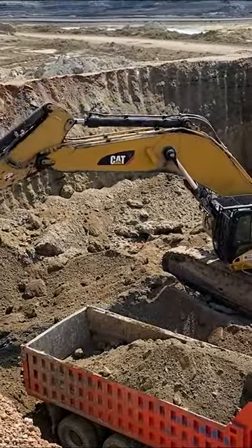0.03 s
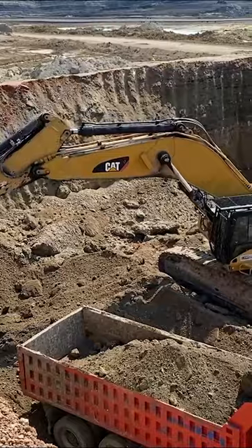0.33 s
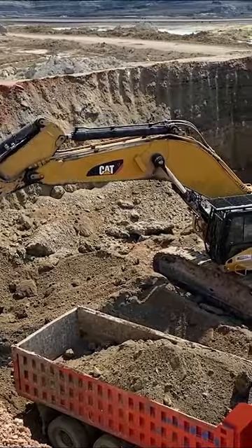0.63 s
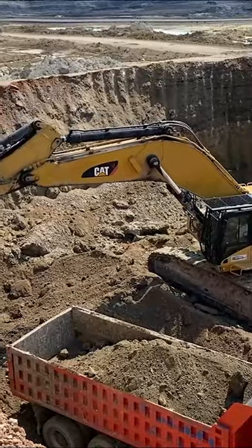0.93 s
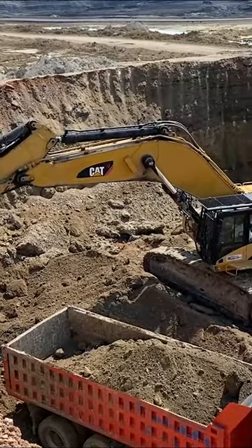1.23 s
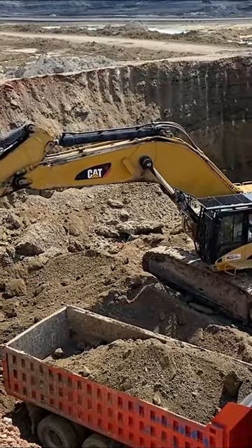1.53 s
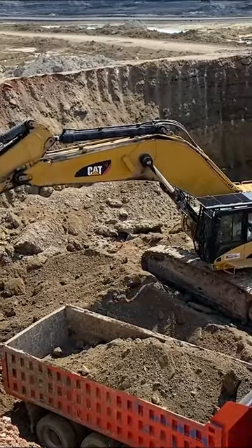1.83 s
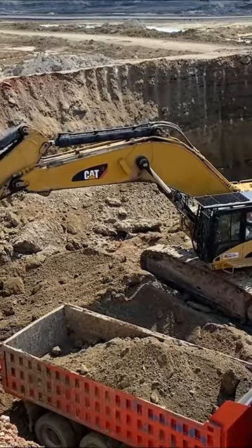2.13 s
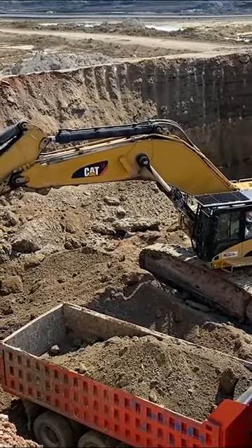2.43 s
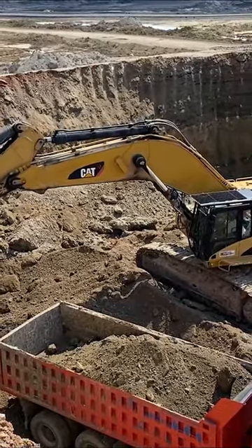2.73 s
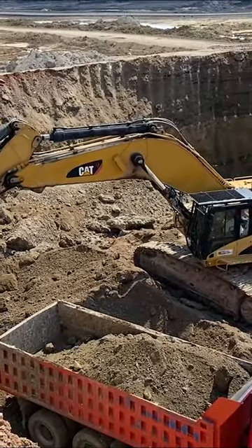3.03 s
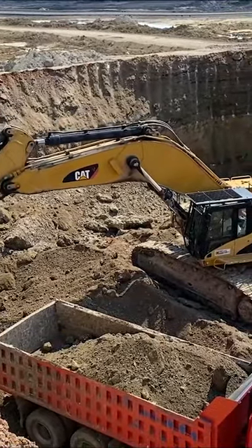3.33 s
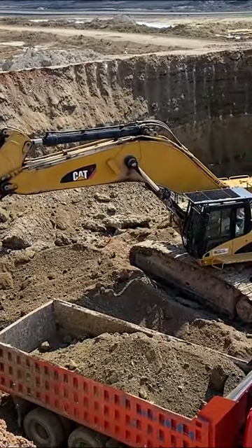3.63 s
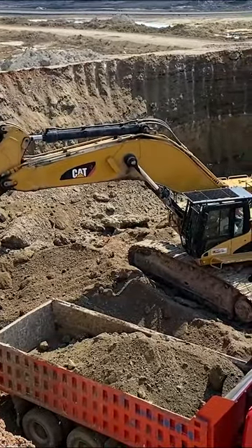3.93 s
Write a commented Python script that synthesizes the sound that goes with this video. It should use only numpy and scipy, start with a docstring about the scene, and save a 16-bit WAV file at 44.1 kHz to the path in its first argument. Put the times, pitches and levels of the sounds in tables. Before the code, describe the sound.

An excavator's diesel engine drones and clatters throughout, sagging slightly under load, with a pump hum and faint hydraulic hiss. A thin squeal and light squeaks sound in the first second and a half. From about 1.5 seconds the steel bucket knocks and clanks, strongest then, around 2 seconds and near 3.3. Earth tumbles dully with the knocks, clods thump and stones clack, until a last knock near 3.8 seconds.

```python
"""A six-cylinder diesel drones and clatters, sagging under load: an excavator in a sand pit, from the rim.
Exhaust tones and pump hum follow the crankshaft; each firing rattles the casing. The steel bucket
knocks and clanks several times, earth tumbles with a dull rumble, clods thump and stones clack.
Behind these, oil hisses through valves, the arm squeals thinly and its joints squeak."""
import sys
import numpy as np
from scipy import signal
from scipy.fft import rfft, irfft
from scipy.io import wavfile

SR = 44100
rng = np.random.default_rng(int(sys.argv[2]) if len(sys.argv) > 2 else 0)


def unload_audio(sound):
    """Save the sound as a 16-bit wav file, at the path given as the first command line argument."""
    columns = np.transpose(np.atleast_2d(sound))
    # keep every value between -1 and 1, then stretch to whole-number steps
    steps = np.round(np.clip(columns, -1, 1) * 32767)
    wavfile.write(sys.argv[1], SR, steps.astype(np.int16))


N = 176400
T = np.arange(N) / SR

# crankshaft speed: time_s, speed_hz
CRANK_SPEED = [(0, 30.5), (.3, 30.4), (.58, 32.2), (1.4, 32.6), (1.85, 32.4), (2.07, 30.8), (2.45, 32.8),
               (3, 32.4), (3.25, 31.6), (3.66, 32.7), (4, 31.2)]
# bucket knocks: start_s, level_db, rattle_s, thud_db, crack_db
BUCKET_KNOCKS = [(1.546, -18, 0.037, 2, 1.5), (1.947, -22.5, 0.0063, -1.5, -2.5),
                 (2.012, -19.5, 0.025, -1, 2.5), (2.062, -21, 0.051, 1, 3.5),
                 (2.299, -28.5, 0.0069, -4, -1), (2.619, -27.5, 0.015, -1, -1),
                 (2.668, -36.5, 0.0064, -5, 14), (2.946, -27, 0.022, -5, 1.5), (3.25, -23.5, 0.019, -2, -2),
                 (3.327, -25.5, 0.025, -6.5, 3), (3.386, -18.5, 0.016, -8, 3.5),
                 (3.84, -27.5, 0.016, 2, -1)]
# midrange of an impact: freq_hz, density_db
CLANK_SPECTRUM = [(250, -12), (500, 3), (780, 4.5), (880, -4), (1150, 6), (1400, -2.5), (1880, -9.5),
                  (2150, -4), (2800, -46)]


def exhaust():
    """Drone at the firing rate, three per crank turn, and its octave."""
    # firing tone: time_s, level_db
    loudness = [(0, -15), (.35, -16), (.6, -22.5), (1.78, -24), (1.93, -19.5), (2.1, -19.5), (2.35, -24),
                (3.3, -20), (3.66, -26.5), (4, -16.5)]
    # exhaust tones: crank_multiple, gain_db
    orders = [(3, -0.5), (6, -10)]
    return from_db(in_time(loudness)[0]) * crank_tones(orders, flutter_db=2.0, wander_rad=0.19)


def casing_clatter():
    """Noise swells at every firing and excites the engine casing."""
    # casing resonances: pitch_hz, base_width_hz, gain_db
    modes = [(583, 146, -1.5), (669, 82, -2), (1048, 120, -2), (1608, 147, -2.5), (2158, 112, -3.5),
             (6270, 110, -18.5)]
    level_db, firing_depth, broadening = -32, 0.215, 1.6
    firing = np.cos(2 * np.pi * 3 * crank_turns())
    bursts = noise([(20, 0), (20000, 0)]) * np.exp(firing_depth * firing) * from_db(drift(17))
    clatter = sum(from_db(db) * resonate_twice(bursts, hz, width_hz * broadening)
                  for hz, width_hz, db in modes)
    return from_db(level_db) * rms_one(clatter)


def bucket():
    """Each knock is a run of contacts: thud, gritty clank, crack, sprayed sand and ringing steel."""
    # low end of a knock: freq_hz, density_db
    thud_spectrum = [(70, -7), (140, 1.5), (270, 5.5), (420, -4.5), (700, -52)]
    # top end of a knock: freq_hz, density_db
    crack_spectrum = [(1500, -0.5), (2600, -3), (3700, 2), (4800, -6), (7500, -36)]
    # sand thrown by blows into soil: centre_hz, width_hz, re_thud_db
    spray_band = (6000, 3000, -19)
    # steel bucket modes: pitch_hz, gain_db, t60_s
    modes = [(537, -5.5, .8), (783, -2, 0.42), (1220, -8, 0.19), (1603, 2, 0.12), (2210, -0.5, 0.17),
             (2907, -12.5, 0.35), (3520, -3, .16)]
    clank_gain_db, crack_gain_db, ring_gain_db = 0.5, -7, -5.5
    contacts_per_s, right_lag_ms = 620, 0.09  # the bucket works to the left
    _, db, _, thud_db, crack_db = np.transpose(BUCKET_KNOCKS)
    grit = rms_one(from_db(-drift(130)))
    thud = knock_envelope(db + thud_db, t60_s=0.37) * noise(thud_spectrum, direct=True)
    clank = knock_envelope(db + thud_db / 2 + clank_gain_db, t60_s=0.24)
    clank = clank * noise(CLANK_SPECTRUM, direct=True)
    crack = knock_envelope(db + crack_db + crack_gain_db, t60_s=0.14)
    crack = crack * noise(crack_spectrum, direct=True)
    spray_hz, spray_width_hz, spray_db = spray_band
    sand = resonate_twice(rng.standard_normal((2, N)), spray_hz, spray_width_hz)
    spray = knock_envelope(db + thud_db + spray_db, t60_s=0.14) * rms_one(sand)
    force = knock_envelope(db - thud_db, t60_s=0.052)  # blows cushioned by soil ring less
    contacts = force * (rng.random(N) < contacts_per_s / SR)
    steel = 0
    for hz, mode_db, t60_s in modes:
        coupling = rng.standard_normal(N) + 0.5 * rng.standard_normal((2, N))
        steel += from_db(mode_db) * ring(contacts * coupling, hz, t60_s)
    ringing = from_db(ring_gain_db) * np.std(force) * rms_one(steel)
    left, right = thud + grit * (clank + crack + spray) + ringing
    return np.array([left, lag(right, right_lag_ms)])


def knock_envelope(levels_db, t60_s):
    """Every knock rises, holds while the bucket rattles, and dies away."""
    attack_share = 0.23
    power = 0
    for (start_s, _, rattle_s, _, _), db in zip(BUCKET_KNOCKS, levels_db):
        rise = np.clip((T - start_s) / (attack_share * rattle_s), 0, 1)
        power += (from_db(db) * rise * decay(start_s + rattle_s, t60_s)) ** 2
    return np.sqrt(power)


def earth():
    """Soil tumbles in a lumpy rumble; heavy clods thump as they land."""
    # tumbling soil: time_s, level_db
    loudness = [(1.55, -43), (1.62, -16), (1.8, -52), (2.03, -14.5), (2.4, -20), (2.52, -27.5), (3.05, -29),
                (3.42, -21), (3.72, -31), (3.9, -24.5)]
    # soil colour: freq_hz, density_db
    spectrum = [(33, -23), (130, 2), (200, -2.5), (400, -11.5), (1100, -17), (1900, -38.5), (9000, -58)]
    # clod landings: start_s, impulse_db
    clods = [(1.582, -0.5), (2.228, -3), (2.388, -1), (2.424, -3.5), (3.356, -5), (3.937, -7)]
    clod_hz, lumps_db = 135, 2.1
    landings = np.zeros(N)
    for start_s, db in clods:
        landings[int(start_s * SR)] = from_db(db)
    thumps = ring(resonate(landings, clod_hz, 2 * clod_hz), clod_hz, t60_s=0.04)
    tumble = rms_one(noise(spectrum) * from_db(lumps_db * drift(30)))
    return thumps + from_db(in_time(loudness)[0]) * tumble


def stones():
    """Loose stones drop, each with a dry clack."""
    # stone landings: start_s, level_db
    drops = [(1.669, -23), (2.176, -26.5), (2.205, -27), (2.696, -24), (3.161, -27), (3.814, -28)]
    envelope = sum((T > start_s) * from_db(db) * decay(start_s, t60_s=0.1) for start_s, db in drops)
    clack = resonate(noise(CLANK_SPECTRUM, direct=True), hz=1120, width_hz=1100)
    return envelope * rms_one(clack)


def machine_rumble():
    """Low, nearly steady noise of the machinery."""
    # rumble colour: freq_hz, density_db
    spectrum = [(25, -27), (42, -5), (60, 1.5), (155, -4.5), (215, -12), (340, -12.5), (430, -19.5),
                (1400, -25.5), (1900, -35), (2800, -33.5), (5000, -40), (8000, -60)]
    return from_db(-22 + 0.24 * drift(13)) * noise(spectrum)


def pump_hum():
    """The hydraulic pumps hum at multiples of crank speed."""
    # hum: time_s, level_db
    loudness = [(0, -34), (.45, -33), (.6, -29), (1.15, -28.5), (1.45, -35), (3.3, -34), (3.65, -32),
                (4, -35.5)]
    # pump tones: crank_multiple, gain_db
    orders = [(7, -0.5), (9, -1), (18, -14.5)]
    return from_db(in_time(loudness)[0]) * crank_tones(orders, flutter_db=1.0, wander_rad=0.1)


def singing_panel():
    """A panel resonates when the sagging engine brings a pump tone onto its pitch."""
    # panel resonance: unrounded_crank_multiple, pitch_hz, width_hz, peak_db
    resonance = (17.5, 555, 16, -33)
    order, hz, width_hz, db = resonance
    drive_hz = np.round(order) * in_time(CRANK_SPEED)[0]
    response = 1 / np.hypot(1, 2 * (drive_hz - hz) / width_hz)
    return from_db(db + 2 * drift(4.9)) * response * np.sin(2 * np.pi * np.cumsum(drive_hz) / SR)


def valves():
    """Oil hisses through valves with a faint falling whistle, reaching the right ear first."""
    # oil hiss: time_s, level_db
    loudness = [(0, -41), (.3, -38), (1.2, -45), (1.42, -42.5), (1.75, -49), (2.03, -40), (2.55, -42.5),
                (3, -45), (3.6, -42.5), (3.8, -47)]
    # hiss colour: freq_hz, density_db
    spectrum = [(1500, -5), (3600, 3), (5400, -2.5), (7500, 0), (10700, 1.5), (14000, -10)]
    # breathy whistle: time_s, pitch_hz, level_db
    whistle = [(.45, 12200, -53), (.72, 11400, -44.5), (1.42, 10150, -54), (1.9, 9150, -57)]
    whistle_hz, whistle_db = in_time(whistle)
    hiss_gain = from_db(in_time(loudness)[0] + drift(16))
    direct = hiss_gain * noise(spectrum)[0] + from_db(whistle_db) * narrow_tone(whistle_hz, width_hz=360)
    diffuse = hiss_gain * from_db(-4.5) * noise(spectrum)
    return np.array([lag(direct, ms=0.184), direct]) + diffuse


def arm_squeal():
    """The moving arm gives one thin, wavering tone."""
    # squeal: start_s, length_s, pitch_hz, level_db
    squeal = (.04, .72, 3815, -48)
    start_s, length_s, hz, db = squeal
    ears = np.array([np.sqrt(2) * np.sin(2 * np.pi * hz * T + drift(10)) for _ in "LR"])
    return from_db(db) * swell(start_s, length_s) * ears


def joint_squeaks():
    """Joints squeak in stuttering pairs of close tones."""
    # squeaks: start_s, length_s, pitch_hz, level_db
    squeaks = [(0.511, 0.065, 4560, -42), (0.608, 0.22, 4420, -44), (1.087, 0.07, 3840, -46),
               (1.28, .09, 3780, -45.5), (1.557, 0.11, 6900, -47.5), (2.4, .17, 6300, -48),
               (2.497, .06, 4270, -44)]
    width_hz, pair_ratio, stutter_db = 47, 0.957, 3
    out = np.zeros((2, N))
    for start_s, length_s, hz, db in squeaks:
        ears = np.array([narrow_tone(hz, width_hz) + narrow_tone(hz * pair_ratio, width_hz) for _ in "LR"])
        out += from_db(db + stutter_db * drift(15)) * swell(start_s, length_s) * ears
    return out


def dry_tick():
    """One small, bright tick close by."""
    # tick: start_s, level_db, decay_s
    event = (3.102, -23.5, 0.0021)
    start_s, db, decay_s = event
    envelope = (T > start_s) * np.exp(-np.clip((T - start_s) / decay_s, 0, 20))
    return from_db(db) * envelope * noise([(1500, -9), (7500, 4), (15000, -4)])


def crank_turns():
    """Running count of crankshaft turns."""
    return np.cumsum(in_time(CRANK_SPEED)[0]) / SR


def crank_tones(orders, flutter_db, wander_rad):
    """Tones locked to the crankshaft, each a little unsteady in level and phase."""
    angle_rad = 2 * np.pi * crank_turns()
    out = 0
    for order, db in orders:
        gain = from_db(db + flutter_db * drift(13.7))
        out += gain * np.sin(order * angle_rad + wander_rad * drift(7) + rng.uniform(0, 2 * np.pi))
    return np.sqrt(2) * out


def noise(spectrum, direct=False):
    """Coloured stereo noise, alike in the bass and wide in the treble; rms 1."""
    # likeness of the ears, diffuse sound: freq_hz, correlation
    diffuse_likeness = [(40, 0.62), (400, 0.81), (2600, 0.4), (5000, 0)]
    # likeness of the ears, impacts arriving more directly: freq_hz, correlation
    direct_likeness = [(600, 0.97), (4200, 0.59), (5500, 0.11)]
    hz = np.fft.rfftfreq(N, 1 / SR)
    mid, side = rfft(rng.standard_normal((2, N)))
    alike = at_hz(direct_likeness if direct else diffuse_likeness, hz)
    ears = np.sqrt(1 + alike) * mid + np.sqrt(1 - alike) * side * [[1], [-1]]
    return rms_one(irfft(ears * from_db(at_hz(spectrum, hz)), N))


def narrow_tone(hz, width_hz):
    """Unsteady, breathy tone; rms about 1."""
    phase = 2 * np.pi * np.cumsum(hz * np.ones(N)) / SR
    return drift(width_hz) * np.cos(phase) + drift(width_hz) * np.sin(phase)


def drift(rate_hz):
    """Smooth random curve; rms about 1."""
    hop, warmup = 40, 2000
    r = np.exp(-2 * np.pi * rate_hz * hop / SR)
    white = rng.standard_normal(N // hop + warmup + 2)
    slow = signal.lfilter([1], [1, -2 * r, r * r], white)[warmup:]
    return np.interp(np.arange(N) / hop, np.arange(len(slow)), rms_one(slow))


def resonate(x, hz, width_hz):
    """Resonance with peak gain 1."""
    r, w = np.exp(-np.pi * width_hz / SR), 2 * np.pi * hz / SR
    return signal.lfilter(np.array([1, 0, -1]) * (1 - r * r) / 2, [1, -2 * r * np.cos(w), r * r], x)


def resonate_twice(x, hz, width_hz):
    """Two equal resonances in series: steeper skirts."""
    return resonate(resonate(x, hz, width_hz), hz, width_hz)


def ring(clicks, hz, t60_s):
    """A unit click starts a decaying sine of height 1."""
    r, w = np.exp(-np.log(1000) / (t60_s * SR)), 2 * np.pi * hz / SR
    return signal.lfilter([0, np.sin(w)], [1, -2 * r * np.cos(w), r * r], clicks + 1e-18)


def decay(start_s, t60_s):
    """1 until start_s, then an exponential fall."""
    return from_db(-60 * np.clip((T - start_s) / t60_s, 0, 2))


def swell(start_s, length_s):
    """Rounded rise and fall."""
    return np.sqrt(np.abs(np.sin(np.pi * np.clip((T - start_s) / length_s, 0, 1))))


def lag(x, ms):
    """Circular delay."""
    return np.roll(x, round(ms * SR / 1000))


def in_time(rows):
    """Columns of a curve at every sample."""
    time_s, *columns = np.transpose(rows)
    return [np.interp(T, time_s, column) for column in columns]


def at_hz(points, hz):
    """Interpolate on a log-frequency axis."""
    freq_hz, values = np.transpose(points)
    return np.interp(np.log(hz + 1), np.log(freq_hz), values)


def from_db(db):
    """Decibels to gain."""
    return 10 ** (np.asarray(db) / 20)


def rms_one(x):
    """Scale to rms 1."""
    return x / np.sqrt(np.mean(x ** 2) + 1e-20)


def scene():
    """The excavator at work, its drone and rumble slightly to the right."""
    balance = from_db([[-0.8], [0.7]])
    machine = balance * (exhaust() + pump_hum()) + casing_clatter()
    machine += balance * machine_rumble() + singing_panel() + valves()
    return machine + bucket() + earth() + stones() + arm_squeal() + joint_squeaks() + dry_tick()


def record(dry):
    """Peaks clip, the left microphone port favours the presence band, and the top is cut."""
    # port mismatch: centre_hz, width_hz, left_minus_right_db
    port_colour = (3760, 750, 6.1)
    centre_hz, width_hz, db = port_colour
    cutoff_hz = 15700
    hz = np.fft.rfftfreq(2 * N, 1 / SR)
    presence = np.exp(-((hz - centre_hz) / width_hz) ** 2)
    ports = from_db(db / 2 * presence * [[1], [-1]])
    lowpass = 1 / np.sqrt(1 + (hz / cutoff_hz) ** 160)
    clipped = np.clip(dry, -0.95, 0.95)
    return irfft(rfft(clipped, 2 * N) * ports * lowpass)[:, :N]


dry = scene()
out = record(dry)
unload_audio(out)
```